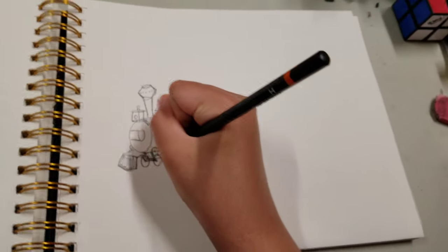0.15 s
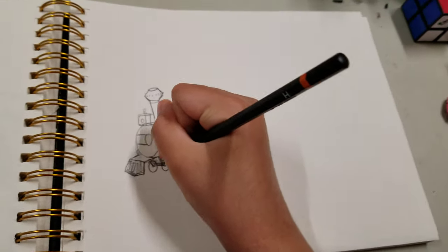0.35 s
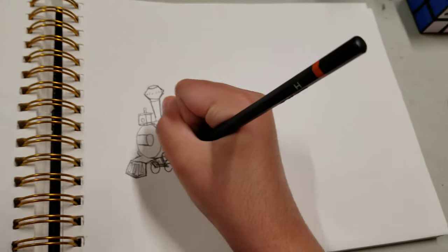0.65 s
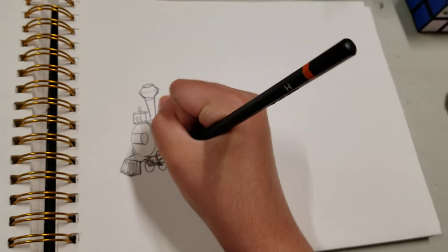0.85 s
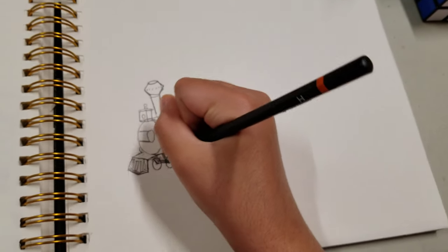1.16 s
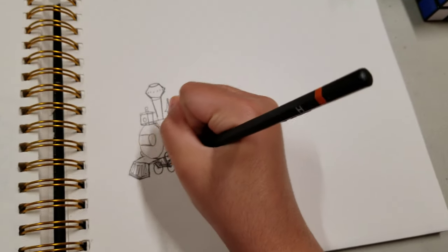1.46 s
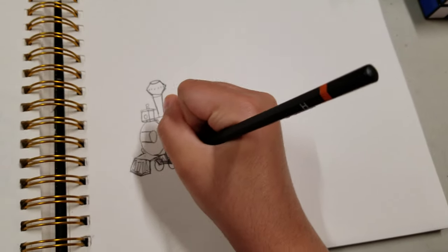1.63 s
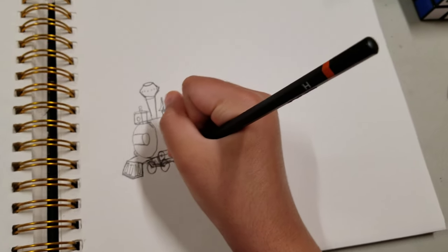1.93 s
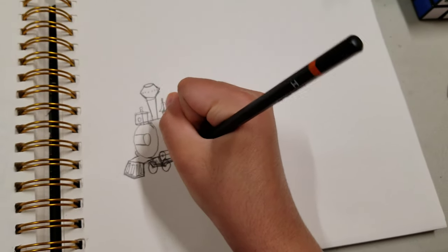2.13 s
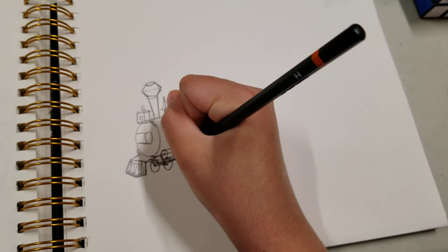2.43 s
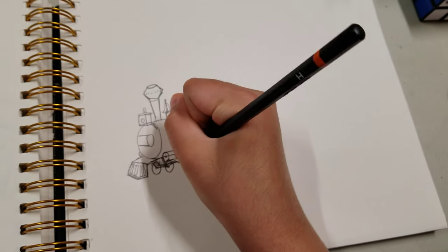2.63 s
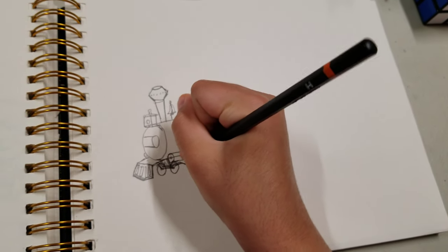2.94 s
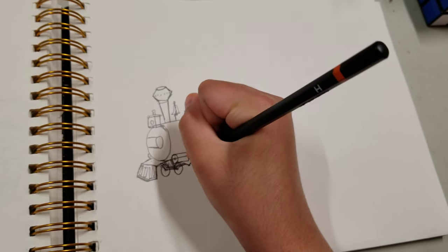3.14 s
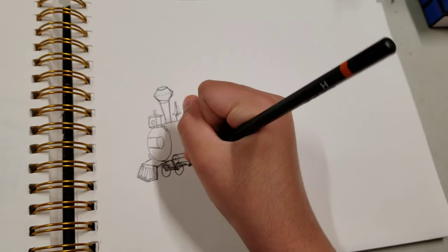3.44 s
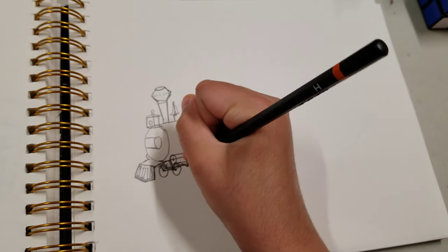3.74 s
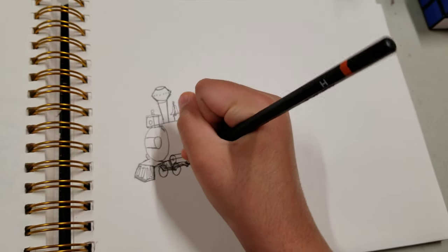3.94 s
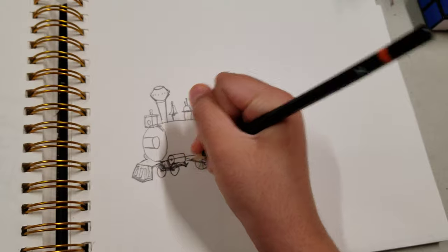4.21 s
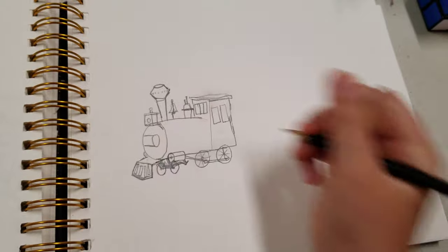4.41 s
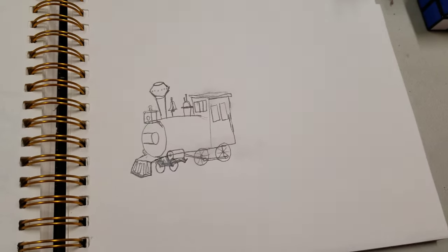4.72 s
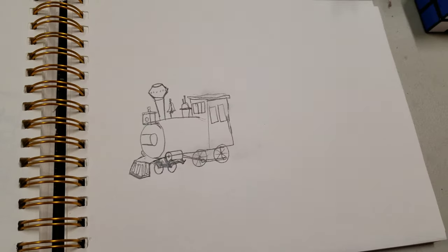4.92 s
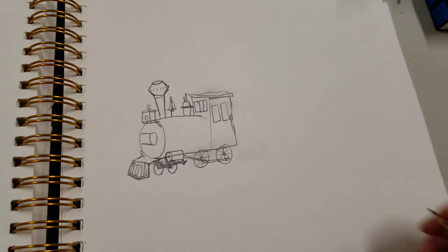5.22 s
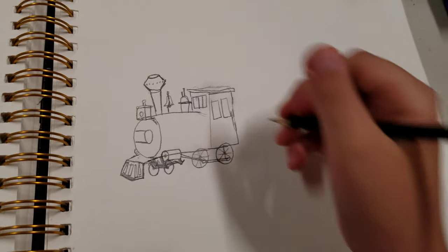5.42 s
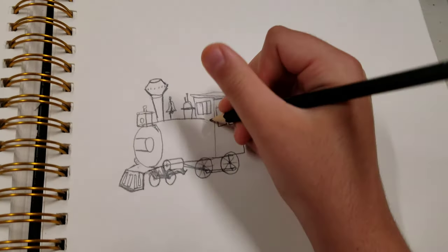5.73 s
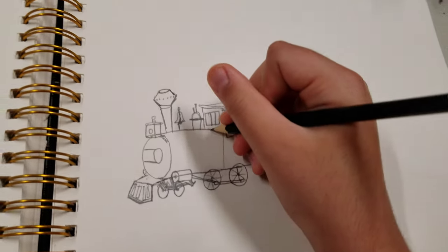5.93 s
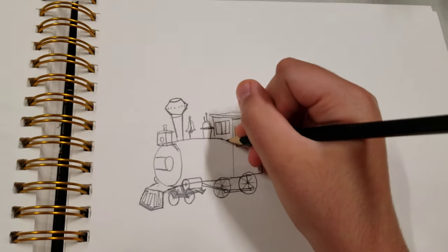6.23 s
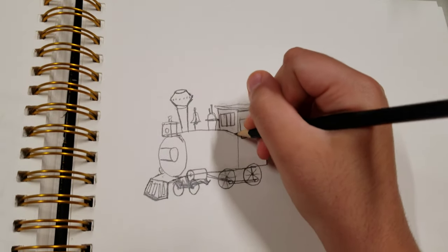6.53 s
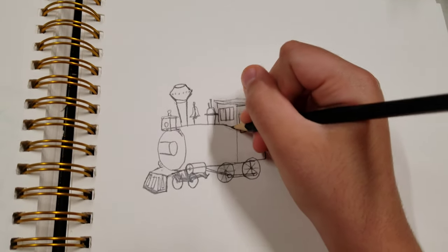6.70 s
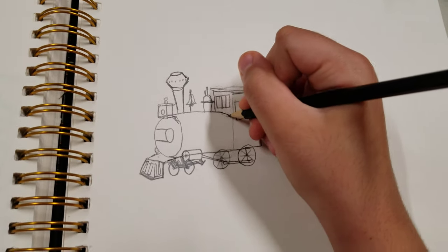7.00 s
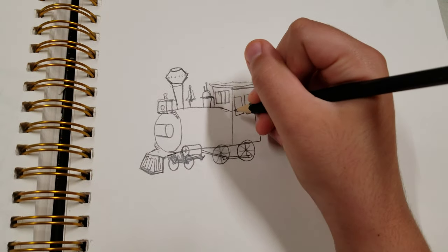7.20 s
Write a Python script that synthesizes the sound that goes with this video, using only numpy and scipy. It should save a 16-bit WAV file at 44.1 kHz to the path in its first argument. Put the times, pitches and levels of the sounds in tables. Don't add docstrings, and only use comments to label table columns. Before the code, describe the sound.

Close, dry pencil strokes on paper over low ventilation rumble, opened by rubbing and sharp handling pops, later a faint far knock and clatter.

```python
import sys
import numpy as np
from scipy import signal
from scipy.fft import rfft, irfft, next_fast_len
from scipy.io import wavfile
from scipy.ndimage import uniform_filter1d

SR = 44100
rng = np.random.default_rng(int(sys.argv[2]) if len(sys.argv) > 2 else 0)


def voltage_ratio(decibels):
    exponent = np.asarray(decibels, float) / 20
    return 10 ** exponent


def wav_record(signal):
    frames = np.transpose(np.atleast_2d(signal))
    bounded = np.clip(frames, -1, 1)
    quanta = np.round(bounded * 32767).astype(np.int16)
    wavfile.write(sys.argv[1], SR, quanta)


N = 324563


def rms_one(x):
    return x / np.sqrt(np.mean(x ** 2) + 1e-20)


def pan(db):
    return voltage_ratio(np.array([db / 2, -db / 2]))


def drift(rate):
    r = np.exp(-80 * np.pi * rate / SR)
    white = rng.standard_normal(N // 40 + 2002)
    slow = signal.lfilter([1], [1, -2 * r, r * r], white)[2000:]
    return np.interp(np.arange(N) / 40, np.arange(len(slow)), rms_one(slow))


def band(x, low_hz, high_hz):
    sos = signal.butter(2, [low_hz, min(high_hz, .45 * SR)], "band", fs=SR, output="sos")
    return signal.sosfilt(sos, x)


def body(x, modes, patchy_db=0.):
    out = 0
    for k, (hz, width, db) in enumerate(modes):
        r = np.exp(-np.pi * width / SR)
        gain = voltage_ratio(db) * (-1) ** k * (1 - r * r) / 2
        rung = signal.lfilter([gain, 0, -gain], [1, -2 * r * np.cos(2 * np.pi * hz / SR), r * r], x)
        if patchy_db:
            rung = rung * voltage_ratio(patchy_db * drift(21))
        out = out + rung
    return rms_one(out)


def stereo(one, other, alike):
    alike = np.clip(alike, -1, 1)
    return np.sqrt(1 + alike) * one + np.sqrt(1 - alike) * other * [[1], [-1]]


def coloured(white, spectrum, likeness=[(1, 0)], balance=[(1, 0)]):
    size = next_fast_len(N)
    log_hz = np.log(np.arange(size // 2 + 1) * SR / size + 1)
    curves = []
    for points in (spectrum, likeness, balance):
        hz, value = np.transpose(points)
        curves.append(np.interp(log_hz, np.log(hz), value))
    level_db, alike, side_db = curves
    mid, side = rfft(white, size)
    pair = stereo(mid, side, alike)
    return rms_one(irfft(pair * voltage_ratio(level_db) * pan(side_db), size)[:, :N])


def grit(per_s, spread_db):
    sizes = voltage_ratio(spread_db * np.minimum(rng.exponential(1, (2, N)), 4))
    signs = rng.choice([-1, 1], (2, N))
    return rms_one(sizes * signs * (rng.random((2, N)) < per_s / SR))


def swells(rows):
    t = np.arange(N) / SR
    each = []
    for s, db, rise, hold, fall in rows:
        each.append(db - rise * np.maximum(s - t, 0) - fall * np.maximum(t - s - hold, 0))
    return np.maximum(np.max(each, axis=0), -140)


# frequency in Hz, level in dB per Hz.
ROOM_TONE = [(13, -40.5), (22, -12.5), (70, -6), (97, -9), (160, -18), (328, -30.5), (356, -25.5),
             (387, -30.5), (457, -30.5), (885, -44.5), (1970, -43.5), (5170, -56.5), (8720, -66),
             (12500, -47), (16000, -51.5)]
# frequency in Hz, likeness from -1 to 1.
ROOM_LIKENESS = [(60, 1), (240, 0.67), (950, -0.14), (3770, -0.036), (15000, -1.4)]
# frequency in Hz, left-right difference in dB.
ROOM_BALANCE = [(60, 2.5), (240, 1), (950, 0), (3770, 4.5), (15000, 0.5)]
# arrival in seconds, level in dB, rise in dB/s, hold in seconds, fall in dB/s.
WHINE_SWELL = [
    (0.0073, -87, 900, 5.5, 2.2),
]
# frequency in Hz, width in Hz, level in dB.
FAN_MODE = [(5050, 750, 0)]


def room():
    rumble_db = -54.5 + .6 * drift(0.5)
    rumble = coloured(rng.standard_normal((2, N)), ROOM_TONE, ROOM_LIKENESS, ROOM_BALANCE) * voltage_ratio(rumble_db)
    hiss = voltage_ratio(-79) * rms_one(band(rng.standard_normal((2, N)), 14000, 17500))
    whine = body(body(rng.standard_normal((2, N)), FAN_MODE), FAN_MODE)
    return rumble + hiss + voltage_ratio(swells(WHINE_SWELL)) * whine


# arrival in seconds, level in dB, rise in dB/s, hold in seconds, fall in dB/s.
KNOCK_SWELL = [
    (3.13, -49.5, 3200, 0.035, 130.9),
]
# frequency in Hz, level in dB per Hz.
KNOCK_WASH = [(88, -50), (150, -32), (211, -2.5), (254, -11.5), (291, -2.5), (325, -22), (500, -4),
              (602, -11), (871, -10), (1050, -18.5), (1570, -13), (3190, -33), (6000, -40.5), (7800, -72.5),
              (13200, -120)]
# frequency in Hz, width in Hz, level in dB.
WOOD_MODES = [(218.3, 25, -1), (500, 12, -6), (741, 41, -3.5), (1300, 42, 1), (1440, 57.8, -19)]


def knock():
    white = rng.standard_normal((2, N))
    wash = coloured(white, KNOCK_WASH, [(200, 1.0), (1500, 0.1)])
    wash = wash + voltage_ratio(-4) * body(white[::-1], WOOD_MODES)
    return rms_one(wash) * voltage_ratio(swells(KNOCK_SWELL) + 2.0 * drift(39) + 5.0)


# arrival in seconds, level in dB, rise in dB/s, hold in seconds, fall in dB/s.
SHOWER_SWELLS = [
    (4.595, -41.5, 1200, .005, 144),
    (4.575, -66, 2300, .01, 300),
    (4.702, -58.5, 220, .001, 100),
]
# arrival in seconds, level in dB, rise in dB/s, hold in seconds, fall in dB/s.
THUD_SWELLS = [
    (4.56, -38, 2500, 0.0082, 500),
    (4.6, -50.5, 900, 0.00093, 140),
    (4.848, -63.5, 700, .001, 301),
]
# arrival in seconds, level in dB, rise in dB/s, hold in seconds, fall in dB/s.
CREAK_SWELL = [
    (4.95, -79, 330, .1, 280),
]
# frequency in Hz, level in dB per Hz.
SHOWER_TONE = [(710, -57), (1200, -22.5), (2290, -16.5), (2660, -3.5), (3370, -4), (3750, -6), (4070, 0.5),
               (4710, -10.5), (7460, -15), (8500, -41), (11000, -62), (18700, -120)]
# frequency in Hz, width in Hz, level in dB.
METAL_MODES = [(4068, 9, 0), (4138, 7, 0), (4200, 10, -4), (3375, 18, -6), (3250, 18, -6), (9480, 30, -9),
               (10665, 30, -8), (12938, 22, -2), (13025, 22, -2)]
# frequency in Hz, width in Hz, level in dB.
METAL_TOP = [(9870, 96, 6), (10440, 270, -4), (11950, 1100, 0), (13400, 470, 9)]


def clatter():
    level_db = swells(SHOWER_SWELLS)
    white = rng.standard_normal((3, 2, N))
    shower = coloured(white[0], SHOWER_TONE) * voltage_ratio(level_db - 0.5)
    ringing = voltage_ratio(-68) * body(white[1] * voltage_ratio(0.9 * level_db + 80), METAL_MODES)
    creak = voltage_ratio(swells(CREAK_SWELL)) * body(white[2], [(1820, 130, 1), (1650, 130, -2)])

    since_shower = np.maximum(np.arange(N) / SR - SHOWER_SWELLS[0][0], 0)
    top_db = swells(SHOWER_SWELLS[::2]) - 8.0 - 16 * since_shower
    top = rms_one(band(band(white[1], 8000, 16500), 9000, 16000))
    top = top + voltage_ratio(-3.5) * body(white[0], METAL_TOP)
    top = top * voltage_ratio(top_db) * pan(-14.5)[:, None]

    thud_tone = [(60, -4), (150, 0.0), (450, -7.0), (1000, -20.5), (2500, -28.5), (4000, -65)]
    thud = coloured(white[2], thud_tone, [(100, 1.0), (1400, 0.0813)]) * voltage_ratio(swells(THUD_SWELLS) + 1.8)
    return shower + ringing + creak + top + thud


# arrival in seconds, level in dB, rise in dB/s, hold in seconds, fall in dB/s.
SLIDE_SWELLS = [
    (0, -46, 900, .001, 75),
    (.52, -66, 60, .001, 310),
    (.3, -56, 290, .14, 2000),
]
# arrival in seconds, level in dB, rise in dB/s, hold in seconds, fall in dB/s.
SCUFF_SWELLS = [
    (.04, -66, 120, .32, 200),
    (.387, -41, 1500, .052, 3000),
]
# arrival in seconds, level in dB, rise in dB/s, hold in seconds, fall in dB/s.
RUMBLE_SWELLS = [
    (0, -56, 900, .28, 98),
    (.42, -37, 130, .001, 170),
    (.94, -45.5, 465, .001, 89.7),
]
# frequency in Hz, level in dB per Hz.
SLIDE_TONE = [(200, -9.5), (800, -4), (1500, -1), (2000, 0), (2400, 3), (2900, -4.5), (4300, -7),
              (4900, -22), (7500, -26), (16000, -45)]
# frequency in Hz, level in dB per Hz.
SCUFF_TONE = [(200, -2.5), (600, 0.5), (1800, 2), (3500, -12.5), (7500, -25.5), (9000, -34), (16000, -33.5)]
# time in seconds, left-right difference in dB.
FINGER_PLACE = [(0, -3.5), (.2, 21.5), (.27, 4), (.42, 15), (.6, 3), (1.2, -1.5)]


def rubbing():
    slide = coloured(grit(per_s=12000, spread_db=4.0), SLIDE_TONE)
    slide = slide * voltage_ratio(swells(SLIDE_SWELLS) + 3.0 * drift(40))
    scuff = coloured(grit(per_s=2300, spread_db=4.5), SCUFF_TONE, [(1, 0.33)])
    scuff = scuff * voltage_ratio(swells(SCUFF_SWELLS) + 3.0 * drift(220))
    scuff[1] = band(scuff[1], 100, 2600)
    rumble_tone = [(40, -19), (80, -1), (200, 1.0), (450, -10.5), (900, -44.5), (2000, -71.5)]
    rumble = coloured(rng.standard_normal((2, N)), rumble_tone, [(1, 0.43)]) * voltage_ratio(swells(RUMBLE_SWELLS))
    s, place_db = np.transpose(FINGER_PLACE)
    side_db = np.interp(np.arange(N) / SR, s, place_db)
    return (slide + scuff) * pan(side_db) + rumble * pan(.4 * side_db)


# start in seconds, peak in dB, left-right difference in dB,
# pulse frequency in Hz, crack level in dB.
CASING_POPS = [(0.183, -34.5, 3, 509, -32), (.199, -17.5, 20.5, 242, -22.5), (0.276, -41, -22, 500, -30),
               (.289, -33, -8, 604, -13), (.303, -33, 9, 1200, -27), (0.3206, -11, -13.5, 487, -27.5),
               (.361, -37, 7, 800, -29.5), (.3755, -25.5, 12.5, 2500, -6.5), (.386, -25.5, 6, 1496, -18.5),
               (0.3986, -10, 19, 3135, -5.5), (0.4086, -9, 23, 2300, -12.5), (.409, -2, 21.5, 1834, -1),
               (0.4153, -9.5, 12, 2629, 0), (0.4445, -5.5, 25, 1300, -20.5), (.48, -38, 17, 900, -25),
               (.935, -39, 1.5, 120, -50), (1.038, -44, -0.5, 396.8, -30), (1.198, -50, 7, 799.6, -20),
               (4.5334, -12, -14.5, 469.6, -40), (5.117, -51.5, 4, 694, -28), (5.619, -58, 1, 2502, 0),
               (6.601, -60, -2.5, 2480, -5)]


def pops():
    length = 4000
    out, t = np.zeros((2, N + length)), np.arange(length) / SR
    noise = rng.standard_normal((len(CASING_POPS), 2, length))
    for (s, db, side_db, hz, crack_db), hiss in zip(CASING_POPS, noise):
        turns = hz * t
        after = np.maximum(turns - .45, 0)
        pull = np.clip(400 / hz, 0, .85) * np.exp(-((turns - .33) / 0.23) ** 2)
        recoil = np.cos(np.clip(hz / 400, 1.6, 3.2) * after)
        push = 2.2 * (1 - np.exp(-after / .07)) * np.exp(-after / .5)
        edge = push * recoil - pull
        rounded = signal.sosfilt(signal.butter(3, 4.2 * hz, fs=SR, output="sos"), edge)
        near = 0.033 * band(edge, 230, 7000) + rounded
        far = .4 * near + .7 * band(band(edge, 700, 4000), 300, 5000)

        burst = hiss * (after > 0) * np.exp(-after / hz / 0.00043)
        crack = band(band(burst, 4600, 7600), 4600, 7600)
        crack = crack + .9 * band(burst, 1200, 3600)
        crack = crack + .12 * band(band(burst, 10300, 15500), 10300, 15500)
        crack = crack / np.abs(crack[0]).max() * [[1], [.3]]

        thump_db = -9.5 - 4 * np.log2(hz / 500)
        thump = -np.sin(2 * np.pi * 100 * t) * np.exp(-t / 0.007) * 1.5
        pop = [near, far] + voltage_ratio(crack_db) * crack + voltage_ratio(thump_db) * thump
        if side_db <= 0:
            pop = pop[::-1]
        start = round(s * SR)
        out[:, start:start + length] += voltage_ratio(db - abs(side_db) / 2) * pan(side_db)[:, None] * pop
    return out[:, :N]


# frequency in Hz, width in Hz, level in dB.
TIP_MODES = [(10990, 650, 1), (12100, 600, -0.5), (13100, 900, -4), (14400, 1500, -2), (15300, 1200, -5),
             (10100, 240, -13)]
# frequency in Hz, width in Hz, level in dB.
SHAFT_MODES = [(4832, 870, -4), (5950, 640, 1), (7540, 770, -7), (6510, 210, -6.5)]
# frequency in Hz, width in Hz, level in dB.
SHEET_MODES = [(2430, 230, 5.5), (1300, 660, 1), (1800, 490, -12), (3264, 790, -14)]
# frequency in Hz, width in Hz, level in dB.
PAD_MODES = [(940, 340, 0), (1168.6, 190, -9.5), (865, 110, -3.5)]
# frequency in Hz, width in Hz.
PART_RANGES = [(12300, 11000), (5830, 9100), (1630, 3400), (960.3, 600)]
# middle in seconds, length in seconds, tip hiss in dB, weight on the page in dB.
OPENING = [(0.021, 0.029, -60, 0), (0.141, 0.11, -66, -2), (0.335, 0.095, -63.5, 0),
           (0.492, 0.061, -66.5, -3.5)]
# middle in seconds, length in seconds, tip hiss in dB, weight on the page in dB.
OUTLINE = [(0.687, 0.1, -69, -2), (0.863, 0.046, -65, -5.5), (0.92, 0.054, -73, -8),
           (1.04, 0.12, -69.5, -1), (1.194, 0.084, -68.5, 0), (1.342, 0.059, -66.5, -5),
           (1.482, 0.064, -64, 3), (1.593, 0.089, -74.5, 2), (1.72, 0.12, -74.5, 4), (2.014, 0.043, -83, 3),
           (2.165, 0.071, -66, 1.5), (2.305, 0.064, -71, 1.5), (2.468, 0.066, -72, 1),
           (2.843, 0.037, -63.5, -1.5), (2.974, 0.036, -64, -7), (3.12, 0.12, -70.5, -0.5),
           (3.332, 0.031, -67.5, -9), (3.468, 0.054, -67, -14), (3.593, 0.041, -69.5, -1.5),
           (3.739, 0.057, -65, -3.5), (3.893, 0.049, -73, -8), (3.973, 0.048, -72.5, -0.5),
           (4.394, 0.076, -74.5, 1.5)]
# middle in seconds, length in seconds, tip hiss in dB, weight on the page in dB.
SHADING = [(5.623, 0.02716, -67.5, -15.5), (6.205, 0.069, -66.5, 4), (6.368, 0.055, -68.5, 0),
           (6.499, 0.085, -63, 0.5), (6.641, 0.056, -67.5, -0.5), (6.757, 0.073, -68.5, 0),
           (6.948, 0.02, -73, -9.5), (7.018, 0.037, -68.5, -6)]
# strokes, shaft in dB, sheet in dB, pad in dB.
GRIPS = [
    (OPENING, -10.5, 5, -10.5),
    (OUTLINE, -9, -6, -6),
    (SHADING, -14, -17.5, 3.1),
]


def stroke_power():
    t, power = np.arange(N) / SR, np.zeros((4, N))
    for strokes, shaft_db, sheet_db, pad_db in GRIPS:
        for middle, length, db, weight_db in strokes:
            near = np.abs(t - middle) < 2 * length
            place = 2 * (t[near] - middle) / length
            steepness = np.where(place < 0, 2.5, 4.1)
            swell_db = 3.0 - 4.0 * np.abs(place) ** steepness
            parts_db = [0, shaft_db, sheet_db + 0.86 * weight_db, pad_db + weight_db]
            power[:, near] += voltage_ratio(np.add.outer(parts_db, db + swell_db)) ** 2
    busy = np.maximum(uniform_filter1d(power[0], round(.25 * SR)), 0)
    drag = voltage_ratio(-88.5) ** 2 + voltage_ratio(-12) ** 2 * busy
    return power + drag * voltage_ratio([[0], [-8], [-10], [-9]]) ** 2


def pencil():
    one, other = grit(per_s=14000, spread_db=2.5)
    parts = (TIP_MODES, SHAFT_MODES, SHEET_MODES, PAD_MODES)
    likeness, sides_db = (.45, 0.033, 0.27, 0.59), (-6.0, 9.0, 2.0, 0.0)
    out = 0
    for modes, power, alike, side_db, (hz, width) in zip(parts, stroke_power(), likeness, sides_db, PART_RANGES):
        skirt = [(hz, width, 0)]
        ranged = body(body(stereo(one, other, alike), skirt), skirt)
        flutter = voltage_ratio(0.31 * drift(30))
        out = out + body(ranged, modes, patchy_db=2.5) * np.sqrt(power) * flutter * pan(side_db)[:, None]
    return out


def scene():
    left, right = room() + knock() + clatter() + rubbing() + pencil()
    air = [left, np.roll(right, 6)]
    top_cut = signal.ellip(10, .5, 60, 15830, fs=SR, output="sos")
    return signal.sosfilt(top_cut, air) + pops()


def low_pass(x):
    return signal.sosfilt(signal.butter(12, 16970, fs=SR, output="sos"), x)


def record(dry):
    cut = signal.sosfilt(signal.butter(4, 38, "high", fs=SR, output="sos"), dry)
    return low_pass(np.clip(cut, -1, 1))


dry = scene()
out = record(dry)
wav_record(out)
```